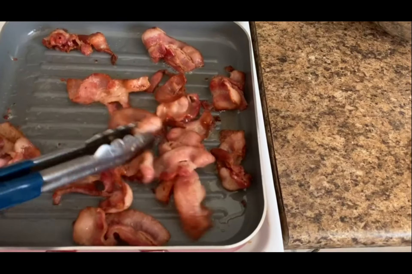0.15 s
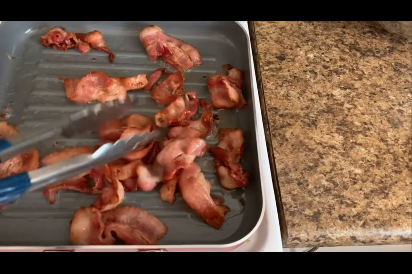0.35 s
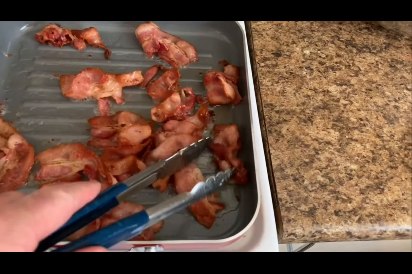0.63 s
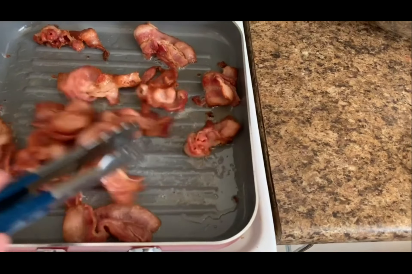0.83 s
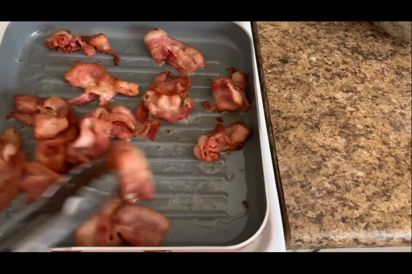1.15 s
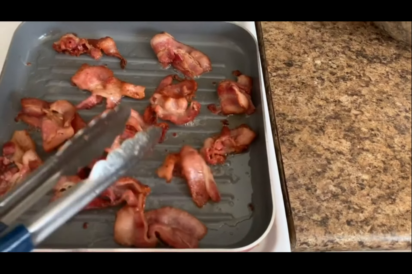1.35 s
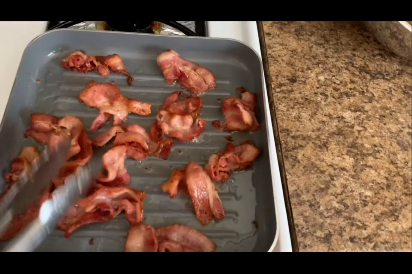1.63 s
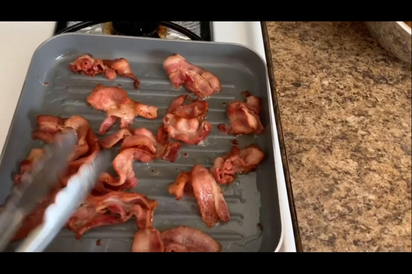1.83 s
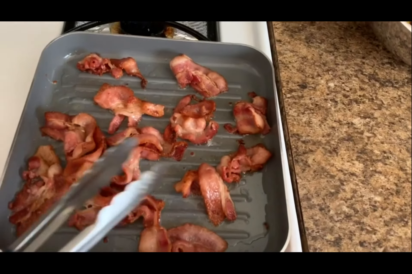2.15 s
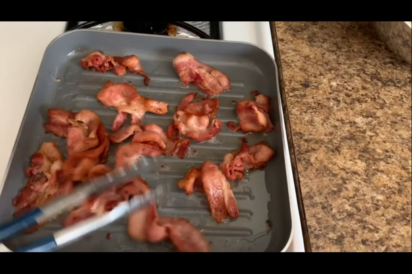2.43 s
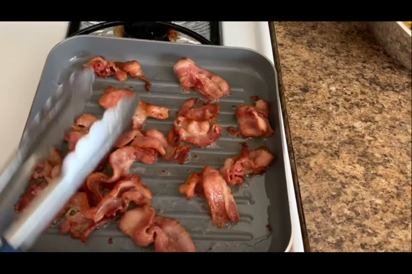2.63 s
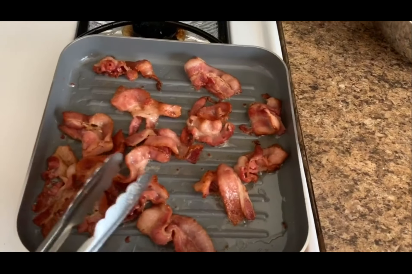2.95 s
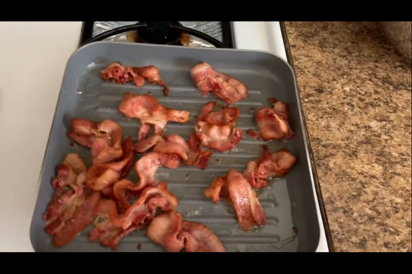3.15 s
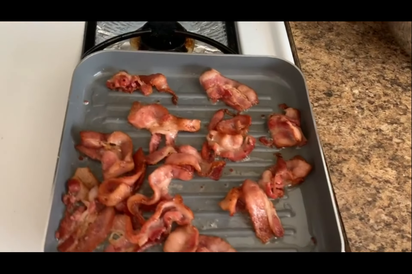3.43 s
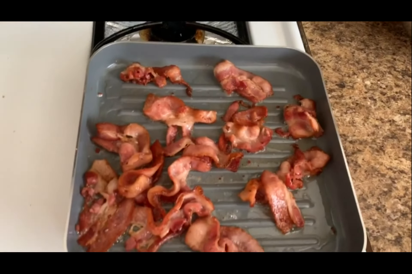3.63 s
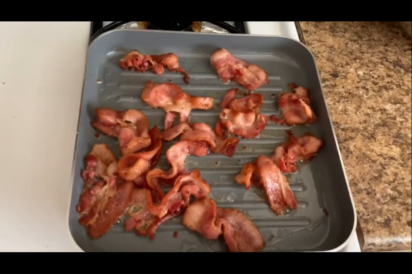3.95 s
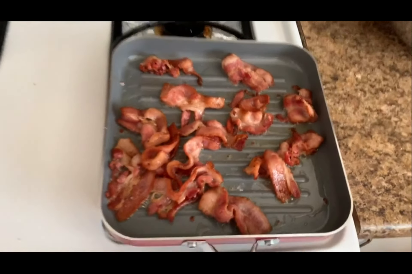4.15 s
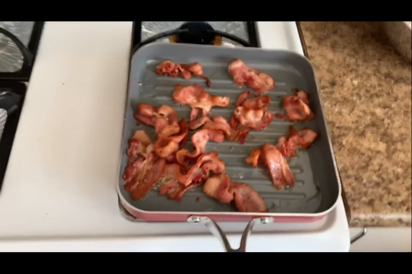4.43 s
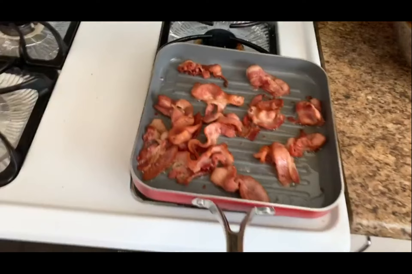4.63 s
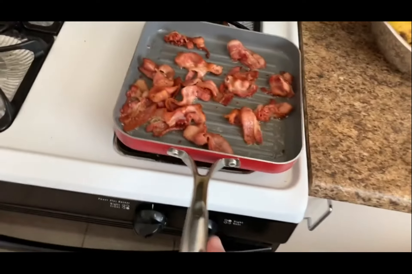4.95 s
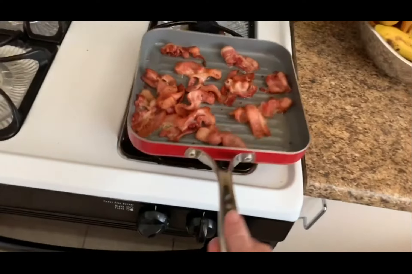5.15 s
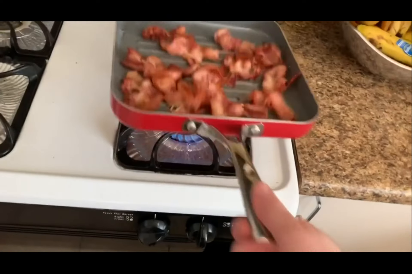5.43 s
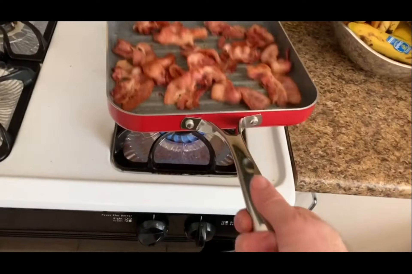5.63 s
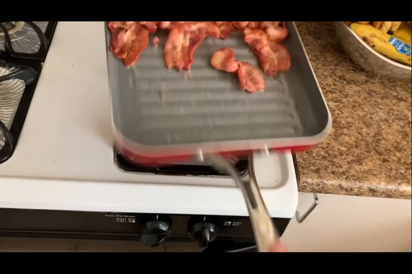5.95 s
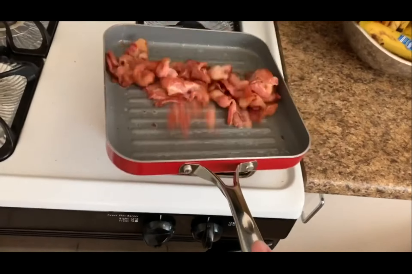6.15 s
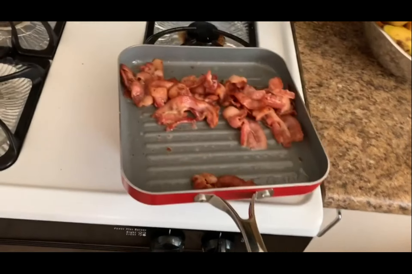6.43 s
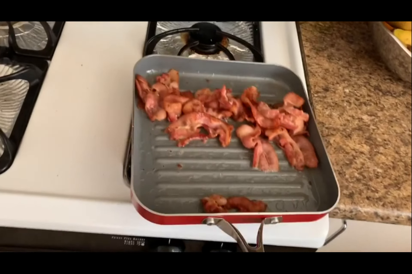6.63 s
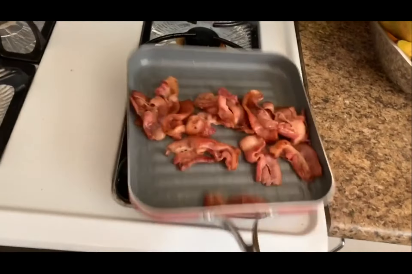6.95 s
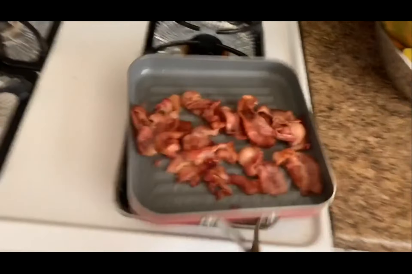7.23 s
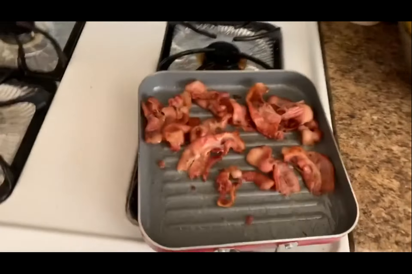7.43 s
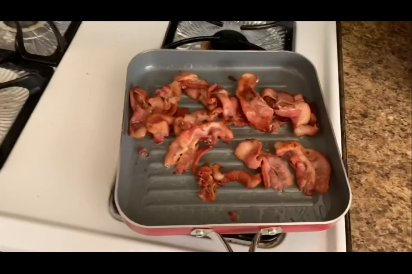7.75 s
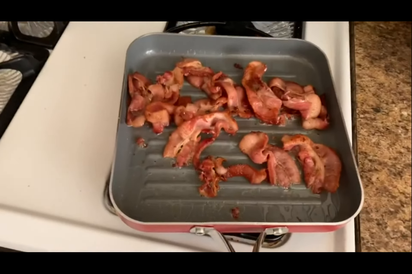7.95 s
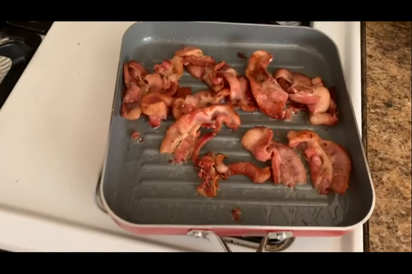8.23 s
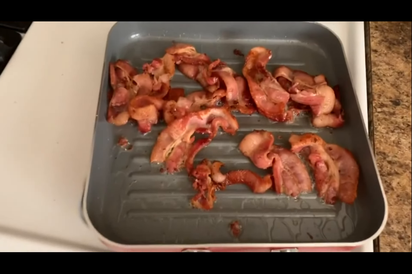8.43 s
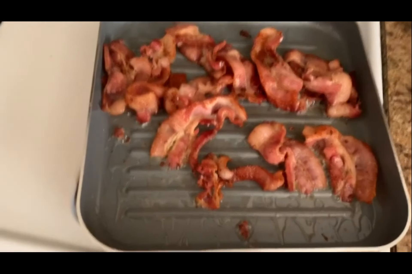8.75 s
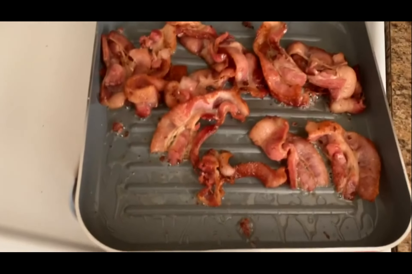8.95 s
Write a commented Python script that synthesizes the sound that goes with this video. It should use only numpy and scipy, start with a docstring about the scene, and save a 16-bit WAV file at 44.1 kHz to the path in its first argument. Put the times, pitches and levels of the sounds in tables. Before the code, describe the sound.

In a small kitchen, bacon sizzles faintly under a fan's hum while tongs tap, the pan clanks loudly, and later slides and rattles on its grate.

```python
"""In a small hard kitchen, steel tongs knock and scrape in a ridged frying pan; then the pan is lifted,
tossed and shaken on the stove grate. Each contact is a blow and chatter driving shared modes and stove sheet.
Fat sizzles and spits as noise impulses and short damped bursts; an extractor fan drones as filtered noise.
The hand shifts on the phone as low rumble and dry knocks; decaying noise gives the room's echo."""
import sys
import numpy as np
from scipy import signal
from scipy.fft import rfft, irfft
from scipy.io import wavfile
from scipy.ndimage import uniform_filter1d

SR = 44100
rng = np.random.default_rng(int(sys.argv[2]) if len(sys.argv) > 2 else 0)


def wav_out(sig):
    """Save sig, one row per channel (or a flat mono array), as 16-bit PCM at SR to the path in sys.argv[1]."""
    wavfile.write(sys.argv[1], SR, np.round(np.clip(np.atleast_2d(sig).T, -1, 1) * 32767).astype(np.int16))


def nominal_scale(level):
    """Amplitude ratio for a level in decibels (scalar or array-like)."""
    x = np.asarray(level, float) / 20
    return 10 ** x


N = 401310  # samples

# Modes shared by all contacts of pan and tongs: f/Hz, relative level/dB
MODES = [(95, -9.5), (131, -3.5), (275, -2.5), (322, -4), (398, -4.5), (446, -11.5), (549, -14), (620, -10),
         (700, -12), (778, -10.5), (920, -15), (1040, -16), (1140, -13.5), (1270, -18.5), (1325, -16),
         (1420, -21.5), (1700, -22.5), (1880, -16.5), (2025, -21.5), (2165, -18), (2285, -19.5),
         (2560, -14), (2720, -18), (2940, -32), (3200, -15), (3450, -20), (3650, -17.5), (4150, -19),
         (4500, -20.5), (4900, -20), (5450, -19.5), (6880, -17), (7250, -19)]
# Response of the stove sheet, too dense in modes to tell apart: f/Hz, relative level/dB
STOVE_SHEET = [(35, -51.5), (60, 10), (319, 6.5), (484, -20), (766, 0), (7290, -20), (8800, -32.5),
               (11400, -81.5), (19400, -120)]
# Dry knocks through the hand-held phone: t/s, peak level/dB, f/Hz
KNOCKS = [(4.229, -46, 750), (4.251, -28, 860), (4.38, -30.5, 583), (4.481, -37.5, 452),
          (4.531, -20.5, 496), (4.545, -9.5, 528), (4.551, -14, 776), (4.577, -28, 784)]
# The loudest spits of fat, before echo: t/s, peak level/dB, f/Hz
SPITS = [(0.1521, -35, 3780), (1.4072, -40, 6800), (1.5474, -38.5, 3860), (1.7524, -27.5, 3800),
         (2.7911, -30, 6400), (3.3852, -37, 6750), (3.4146, -35, 4140), (4.0238, -38.5, 5020),
         (4.2517, -30.5, 4360), (4.3779, -39, 2290), (5.5483, -35, 6830), (5.7448, -39, 5130),
         (6.2257, -30, 4630), (8.0401, -41, 7000), (8.7899, -35.5, 7560), (8.8972, -37, 6800),
         (8.915, -40.5, 2400)]
# Heat of the sizzle; its mean sets the loudness, its departures the flares: t/s, level/dB
SIZZLE = [(0, -55), (1.7, -55), (1.73, -45.5), (1.82, -47.5), (1.87, -55.5), (2.8, -52.5), (4.7, -57),
          (5.4, -52.5), (6.05, -56), (7.8, -56.5), (8.5, -54), (9.1, -52.5)]
# Spectral weighting of the sizzle: f/Hz, relative level/dB
FIZZ = [(710, -18.5), (1200, 3), (1660, -2.5), (1810, -1.5), (2280, -4.5), (3890, 3), (6000, -2.5),
        (7330, 3.5), (7900, -5), (8800, -11.5), (11400, -68), (19400, -120)]
# Spectrum of the fan's drone: f/Hz, relative level/dB
FAN = [(12, -44.5), (20, -27.5), (70, 0.5), (160, -5.5), (201, -3.5), (258, -8.5), (393, -13.5), (494, -18),
       (736, -12), (967, -24.5), (1120, -28.5), (1850, -31), (3000, -26.5), (3900, -46.5), (6600, -120)]
# Resonances of the fan duct: f/Hz, resonance width/Hz, level over the drone/dB
DUCT = [(208.8, 25, 12.5), (788, 14, 6.5)]
# Loudness of the hand's rumble: t/s, level/dB
HANDLING = [(0.0, -54), (1.77, -60), (2.15, -43.5), (2.69, -59), (3.09, -43), (3.17, -50), (4.23, -58),
            (4.38, -41), (4.94, -54), (5.5, -38.5), (5.55, -56), (6.46, -56.5), (7.65, -39), (7.73, -55),
            (9.1, -59)]
# Bands (boom, mids, clank, treble) in which a contact's energy is set: lowest f/Hz, highest f/Hz
BANDS_HZ = np.array([(80, 450), (500, 1400), (1500, 3200), (3500, 8000)])
# Echo by band: lowest f/Hz, highest f/Hz, t60/s, level/dB
ECHO = [(19.9, 312, 0.63, -1.5), (487, 1080, 0.58, -17.5), (1534, 21000, 0.3, -8)]
# The five tables of contacts: t/s, nominal peak level/dB, drag/s, boom level over the mids/dB,
# hardness/dB (lifts the treble in full and the clank by half)
TONGS_IN_PAN = [(0.002, -21, 0.0034, -9.5, -6.5), (0.75, -31, 0.014, -5, -1.5),
                (0.762, -15.5, 0.0056, -17, 1.5), (0.775, -12, 0.015, -20, 2.5),
                (0.831, -12.5, 0.0065, -11, -4.5), (0.847, -31, 0.006, -15, -0.5)]
PAN_KNOCKS_GRATE = [(1.935, -6, 0.032, -8.5, -3), (2.082, -4.5, 0.0083, -10, 1), (2.105, -8, 0.05, -4, 1),
                    (2.362, -7.5, 0.0053, -8.5, 7), (2.383, -13.5, 0.022, -5.5, 4),
                    (2.451, -15, 0.015, -13, 5), (2.909, -5.5, 0.019, -9.5, -3.5),
                    (2.939, -12.5, 0.045, -4, 5), (3.024, -8, 0.0054, -6.5, -11),
                    (6.72, -11, 0.024, -2.5, 5.5), (6.767, -12, 0.014, -7.5, -3.5),
                    (6.88, -5, 0.0039, -6, 5), (6.899, -11, 0.021, -10, 1.5), (7.66, -12, 0.035, -8, -6)]
PAN_SLIDES = [(4.956, -25.5, 0.0083, 3, 2), (4.986, -21, 0.015, -9, -15), (5.055, -9.5, .012, -4, 4.5),
              (5.079, -11.5, 0.041, -5, -0.5), (5.209, -28.5, .01, 4, -7), (5.239, -16.5, 0.021, 0, -4),
              (6.991, -8.5, .05, -2, 0.5), (7.048, -12.5, 0.028, 2, 3), (7.095, -11.5, 0.079, -4.5, 0.5),
              (7.146, -10, 0.026, -8.5, 0), (7.18, -12, .02, -2.5, -2), (7.213, -14.5, 0.045, -11.5, -7.5),
              (7.271, -12, 0.023, -5, 4.5), (7.3, -8, 0.064, -5, -1.5), (7.443, -10, 0.0044, -3.5, 4),
              (7.461, -10, 0.042, -1.5, 3.5), (7.536, -8.5, 0.032, -7, 0.5),
              (7.599, -19.5, 0.025, -10, -24)]
TONGS_PUT_DOWN = [(3.549, -18, 0.0084, 3.5, 3.5), (3.617, -19.5, 0.0092, -7, -1),
                  (3.639, -21.5, 0.014, 0, -2.5), (3.686, -26, 0.016, 5.5, -15),
                  (3.765, -31, 0.0064, -3, -22), (3.795, -30, 0.013, 4, -17)]
PAN_LIFTED = [(5.77, -39, 0.021, -6, 0.67), (6.001, -43.5, 0.015, -3.5, 1), (6.17, -38.5, 0.035, -8.5, 3.5),
              (6.259, -32, 0.0049, -29, 3.6)]
# What each kind of contact shares: contacts, f of the modes woken most/Hz, their gain/dB,
# t60 of modes up to 1500 Hz/s, blow over drag (amplitude ratio), time constant of the drag's sag/s,
# clank level over the mids/dB, treble level over the mids/dB (both before hardness)
KINDS = [(TONGS_IN_PAN, (896, 1106, 1475, 3564), 18.4, 0.063, 1.8, .06, -4.5, -8.5),
         (PAN_KNOCKS_GRATE, (778, 2040), 12.8, 0.071, 2.7, 0.089, -7, -14),
         (PAN_SLIDES, (430, 632, 805, 1330, 2214), 7, .08, 2.15, .15, -6, -11.5),
         (TONGS_PUT_DOWN, (135, 710, 2020, 3450, 4900), 11.8, .1, 1.3, .06, 0, -6),
         (PAN_LIFTED, (920, 1040, 1280, 1700), 12.4, 0.19, 1.2, 0.062, -3, -5)]


def shape(points, hz):
    """Interpolates a spectrum in dB, given as (f/Hz, level/dB), over logarithmic frequency."""
    f, db = np.transpose(points)
    return np.interp(np.log(hz + 1), np.log(f), db)


def causal(db):
    """Minimum-phase response: folding the cepstrum of a dB curve makes its response causal."""
    cepstrum = irfft(np.log(nominal_scale(db)))
    half = len(cepstrum) // 2
    cepstrum[1:half] *= 2
    cepstrum[half + 1:] = 0
    return np.exp(rfft(cepstrum))


def resonance(hz, centre_hz, width):
    """Response of a damped mode: unity at its centre, 3 dB less at half a width either side."""
    return 1 / (1 + 2j * (hz - centre_hz) / width)


def level(x):
    """Normalization to unit effective (rms) value."""
    return x / np.sqrt(np.mean(x ** 2))


def coloured(x, db):
    """Linear filtering of a source by a dB spectrum, normalized to unit rms."""
    return level(irfft(rfft(x) * nominal_scale(db), N))


def curve(rows):
    """Linear interpolation of (t/s, value) points at every sample."""
    return np.interp(np.arange(N) / SR, *np.transpose(rows))


def walk(rate):
    """Slow random fluctuation: levels slewed at about rate changes a second, with unit rms."""
    k = int(SR / rate)
    steps = np.repeat(rng.standard_normal(N // k + 1), k)
    return level(uniform_filter1d(steps, k)[:N])


def add(out, s, x):
    """Superposition of a sound on out from time s."""
    i = max(int(s * SR), 0)
    out[i:i + len(x)] += x[:len(out) - i]


def modal_ring(hz, t60, detune=0.0076, spot_db=2):
    """Modal superposition: one contact's mode responses, signed amplitudes and random gains."""
    f, db = np.transpose(MODES)
    shift, spot, sign = rng.standard_normal((3, len(f)))
    ring_s = t60 * np.minimum(1500 / f, 1) ** 0.58  # high modes die sooner
    centre_hz = f * (1 + detune * shift)  # each contact detunes every mode a little at random
    width_hz = np.log(1000) / np.pi / ring_s
    modes = resonance(hz, centre_hz[:, None], width_hz[:, None]) * (ring_s / 0.063)[:, None]
    return modes, nominal_scale(db) * np.sign(sign), nominal_scale(spot_db * spot)


def chatter(t, drag_s, blow, sag_s, lurch):
    """Stick-slip friction: scattered impulses shaped as skid, blow and drag, with a faint rattle."""
    slips, scatter_db = 0.2, 3  # chance per sample, spread of strength
    skid_db, lead_s, blow_s = -8, 0.0071, 0.0014
    fade_s, rattle_db, rattle_s = 0.0084, -11, 0.044
    size = len(t)
    strength = rng.standard_normal(size) * nominal_scale(scatter_db * rng.standard_normal(size))
    slip = (rng.random(size) < slips) * strength
    after = np.maximum(t - drag_s, 0)
    drag = np.exp(-t / sag_s - after / fade_s) * lurch
    skid = nominal_scale(skid_db) * np.exp(t / lead_s)
    force = slip * np.where(t < 0, skid, drag + blow * np.exp(-t / blow_s))
    # a faint broadband rattle accompanies each contact and dies away after it
    rattle = slip[::-1] * (t > 0) * nominal_scale(rattle_db) * np.exp(-after / rattle_s)
    return force, rattle, drag_s + fade_s


def balance(sound, hz, duration_s, band_db):
    """Spectral balance: sets each contact's energy in boom, mids, clank and treble to its listed levels."""
    size = 2 * (len(hz) - 1)
    bands = [(hz > lo) & (hz < hi) for lo, hi in BANDS_HZ]
    energy = np.array([np.sum(np.abs(sound[k]) ** 2) for k in bands])
    power_db = 10 * np.log10(energy / size ** 2 * size / SR / duration_s)
    edges_hz = BANDS_HZ.ravel() * np.tile([1.1, 0.9], len(bands))
    points = list(zip(edges_hz, np.repeat(band_db - power_db, 2)))
    return sound * causal(shape(points, hz))


def contacts(body_db=-12, lurch_db=1.5, crest_db=11, reach=0.056):
    """Forced vibration: contact forces drive the modes, most near each kind's pitches, and the sheet."""
    size, lead = 2 ** 14, 1024  # samples; the lead holds the skid before the blow
    t, hz = (np.arange(size) - lead) / SR, np.fft.rfftfreq(size, 1 / SR)
    out = np.zeros(N + lead)
    mode_hz = np.transpose(MODES)[0]
    thin = 1 - resonance(hz, 0, 210)  # a small plate radiates no deep bass
    body = nominal_scale(body_db) * causal(shape(STOVE_SHEET, hz))
    lurch = np.resize(nominal_scale(lurch_db * walk(90)), N + size)
    for rows, woken_hz, woken_db, t60, blow, sag_s, clank_db, treble_db in KINDS:
        near = sum(np.exp(-(np.log(mode_hz / p) / reach) ** 2) for p in woken_hz)
        for s, peak_db, drag_s, boom_db, hard_db in rows:
            modes, plain, spot = modal_ring(hz, t60)
            struck = (plain * spot * nominal_scale(woken_db * near)) @ modes
            rattled = plain @ modes  # the rattle wakes no chosen pitches
            force, rattle, duration_s = chatter(t, drag_s, blow, sag_s, lurch[int(s * SR):][:size])
            sound = (rfft(force) * (struck + body) + rfft(rattle) * (rattled + body)) * thin
            over_mids_db = np.array([boom_db, 0, clank_db + hard_db / 2, treble_db + hard_db])
            add(out, s, irfft(balance(sound, hz, duration_s, peak_db - crest_db + over_mids_db)))
    return out[lead:]


def pings(rows, width, rough, t60):
    """Impulse response of one steep resonance, its drive roughened by noise decaying with t60/s."""
    out, t = np.zeros(N), np.arange(8192) / SR
    hz = np.fft.rfftfreq(len(t), 1 / SR)
    for s, peak_db, pitch_hz in rows:
        noise = rng.standard_normal(len(t)) * nominal_scale(-60 * t / t60)
        burst = (1 - rough) * (t == 0) + rough * noise
        bell = resonance(hz, pitch_hz, width * pitch_hz)  # width is relative to pitch
        x = irfft(rfft(burst) * bell * (bell + 0.058) * (1 - resonance(hz, 0, pitch_hz)))
        add(out, s, nominal_scale(peak_db) * x / np.abs(x).max())
    return out


def faint_spits(count=14, mean_db=-44, spread_db=6):
    """Random point process: smaller spits at chance moments, peak levels and pitches."""
    moment, size, pitch = rng.random((count, 3)).T
    return np.c_[moment * N / SR, mean_db + spread_db * (size - 0.5), 2500 * 3 ** pitch]


def spits():
    """Damped transients: loud and faint spits of fat, each a short rough burst."""
    return pings([*SPITS, *faint_spits()], width=0.42, rough=0.41, t60=0.066)


def sizzle(hz, density=0.31, scatter_db=4, patchy_db=1.5, large_share=0.3):
    """Shot noise: tiny bubbles of fat burst densely; each size has its own patches and spectral band."""
    out, heat_db = 0, curve(SIZZLE)
    for size_hz in 1000 * 2 ** np.arange(0, 3.5, 0.5):
        # large bubbles, low in pitch, follow the flares less
        flare_db = (heat_db - heat_db.mean()) * (large_share if size_hz < 2500 else 1)
        patch_db = 1.3 * walk(25) + patchy_db * walk(6)
        burst_db = scatter_db * rng.standard_normal(N) + patch_db + flare_db
        pops = (rng.random(N) < density) * rng.standard_normal(N) * nominal_scale(burst_db)
        out = out + rfft(pops) * np.exp(-(np.log((hz + 1) / size_hz) / 0.3) ** 2)
    return nominal_scale(heat_db.mean()) * level(irfft(out * nominal_scale(shape(FIZZ, hz)), N))


def knocks():
    """Damped impulse responses: dry knocks through the hand-held phone, without echo."""
    return pings(KNOCKS, width=0.56, rough=0.07, t60=0.039)


def handling(hz):
    """Low-frequency noise: the hand shifting on the phone rumbles, strongest near 45 Hz."""
    rumble = [(10, -29.5), (25, -21.5), (45, 1.0), (90, -19.5), (300, -84.0)]  # f/Hz, relative level/dB
    return nominal_scale(curve(HANDLING)) * coloured(rng.standard_normal(N), shape(rumble, hz))


def fan(hz, mean_db=-45.5, swell_db=0.27):
    """Flow noise: a rush of air coloured by the duct's resonances, swelling a little."""
    duct_db = sum(g * np.abs(resonance(hz, c, w)) ** 4 for c, w, g in DUCT)
    rush = coloured(rng.standard_normal(N), shape(FAN, hz) + duct_db)
    return nominal_scale(mean_db + swell_db * walk(1.2)) * rush


def kitchen(x):
    """Diffuse reverberation as decaying noise; the bass, held by the stove sheet, stays longer."""
    t = np.arange(SR) / SR
    tail = 0
    for lo_hz, hi_hz, t60, db in ECHO:
        band = signal.butter(2, (lo_hz, hi_hz), "band", fs=SR, output="sos")
        noise = signal.sosfilt(band, rng.standard_normal(SR))
        noise *= nominal_scale(-60 * t / t60) * np.clip(t / 0.0019, 0, 1)
        # unit gain within its own band
        tail = tail + nominal_scale(db) * level(noise) * np.sqrt(2 * (hi_hz - lo_hz)) / SR
    return x + signal.fftconvolve(x, tail)[:N]


def scene():
    """Superposition: contacts and spits excite the room's echo; the other sources are added dry."""
    hz = np.fft.rfftfreq(N, 1 / SR)
    echoing = kitchen(contacts() + spits())
    return (echoing + knocks() + sizzle(hz) + fan(hz) + handling(hz))[None]


def top_cut(x):
    """Nothing passes above the cut-off."""
    return signal.sosfilt(signal.butter(12, 9000, fs=SR, output="sos"), x)


def record(dry):
    """Band limiting and saturation: the phone cuts the treble steeply and flattens the loudest peaks."""
    top_hz, ceiling = 9350, 0.72  # 60 dB down from top_hz; peaks bend smoothly towards the ceiling
    x = signal.sosfilt(signal.cheby2(14, 60, top_hz, fs=SR, output="sos"), dry)
    x = x / (1 + np.abs(x / ceiling) ** 8) ** (1 / 8)
    return top_cut(x)


dry = scene()
out = record(dry)
wav_out(out)
```